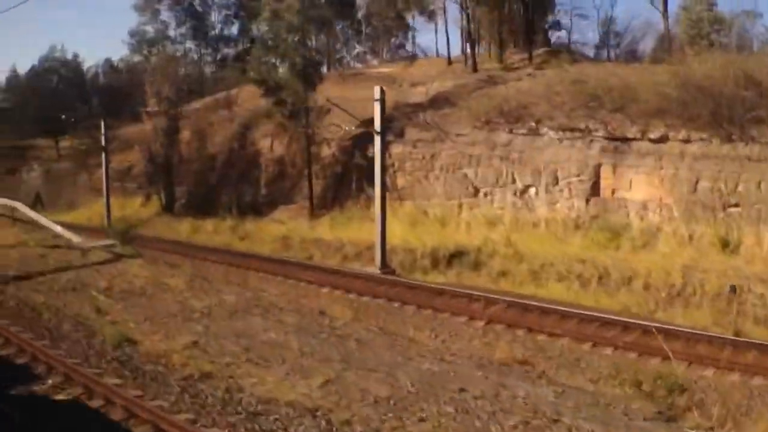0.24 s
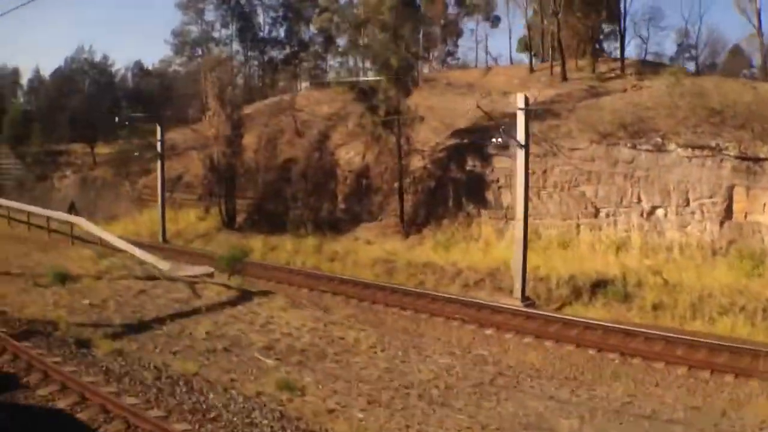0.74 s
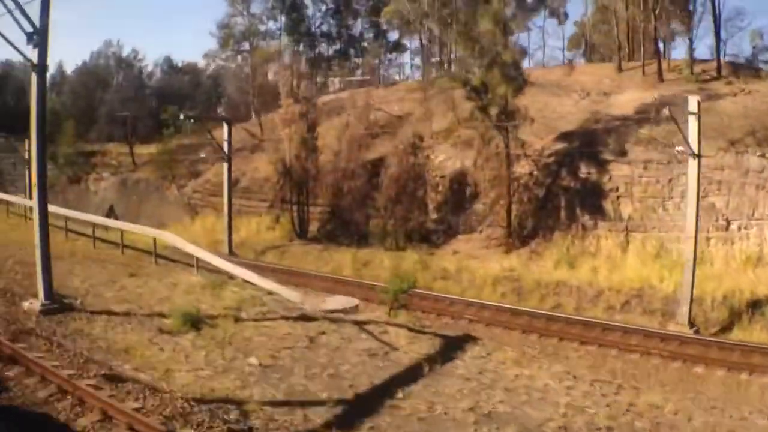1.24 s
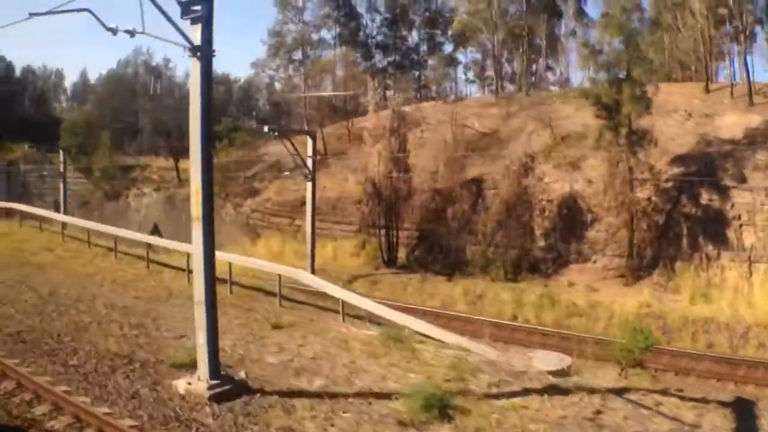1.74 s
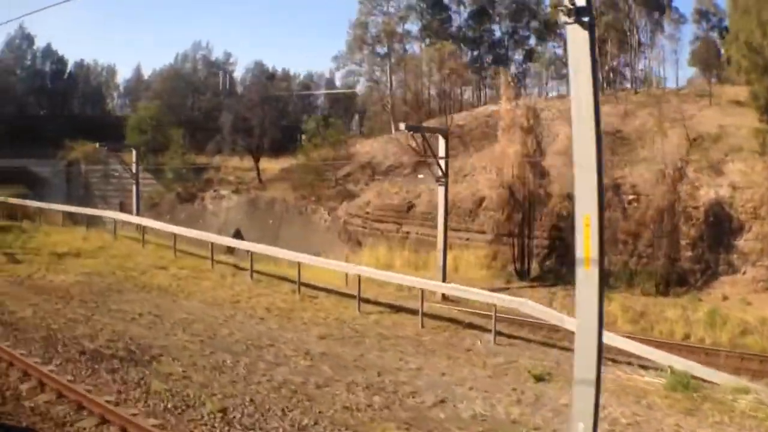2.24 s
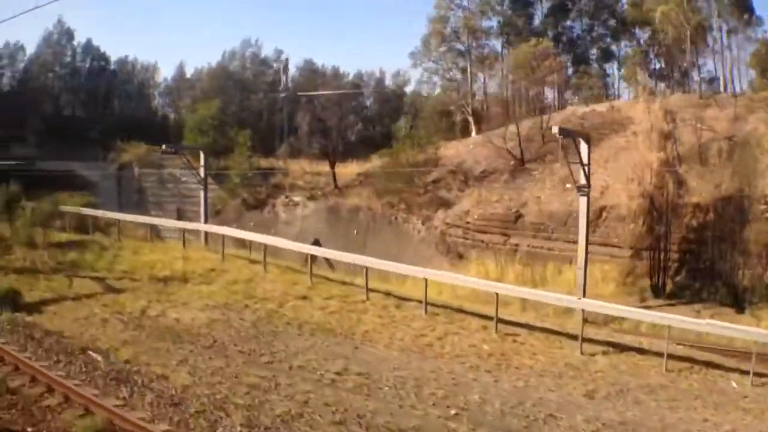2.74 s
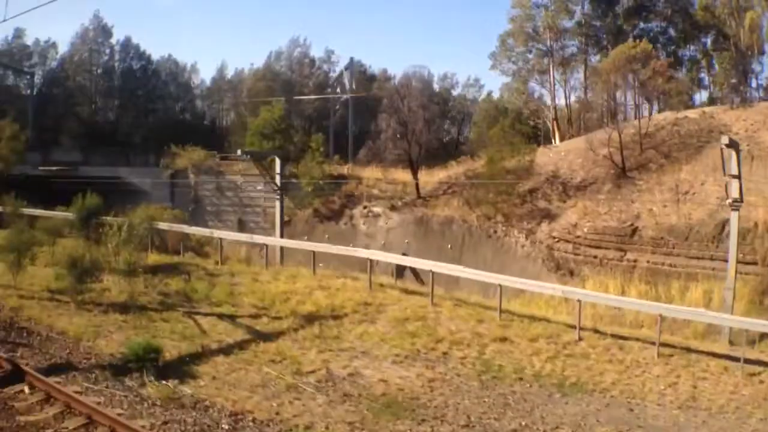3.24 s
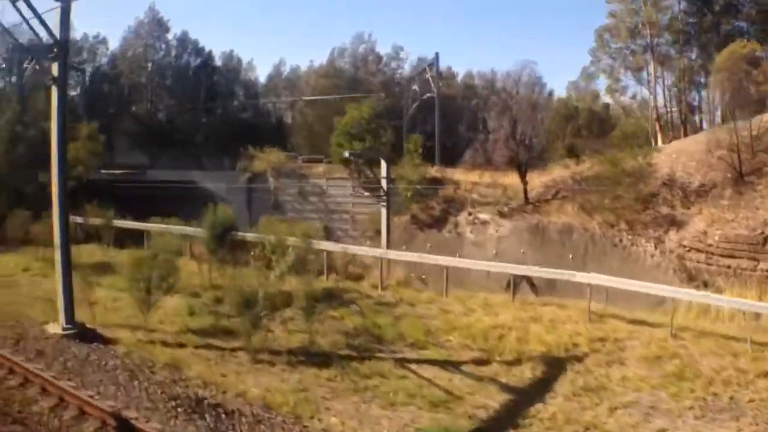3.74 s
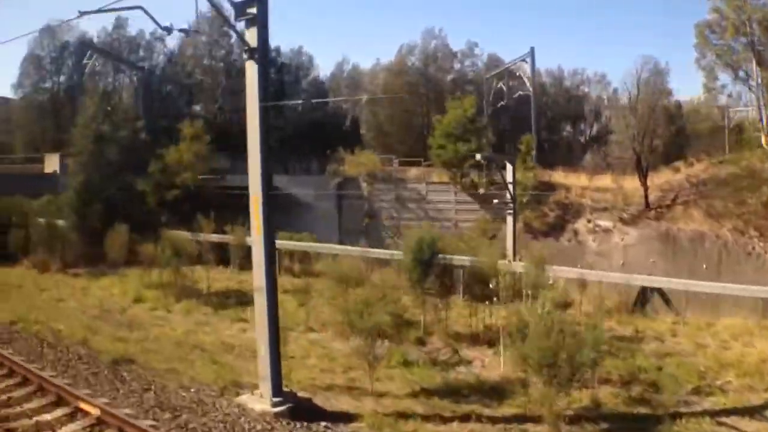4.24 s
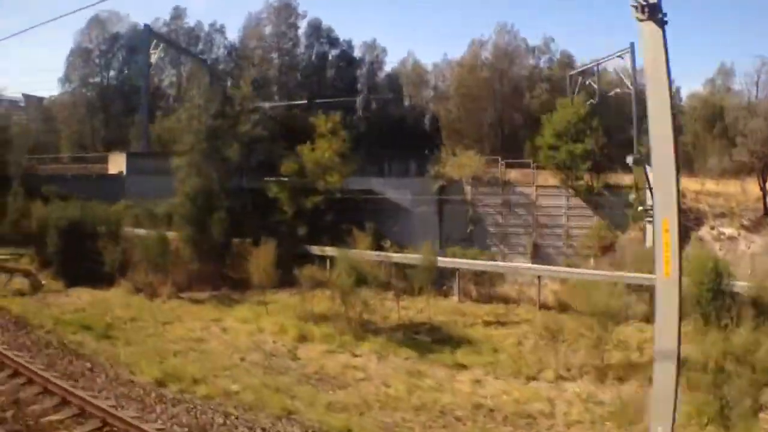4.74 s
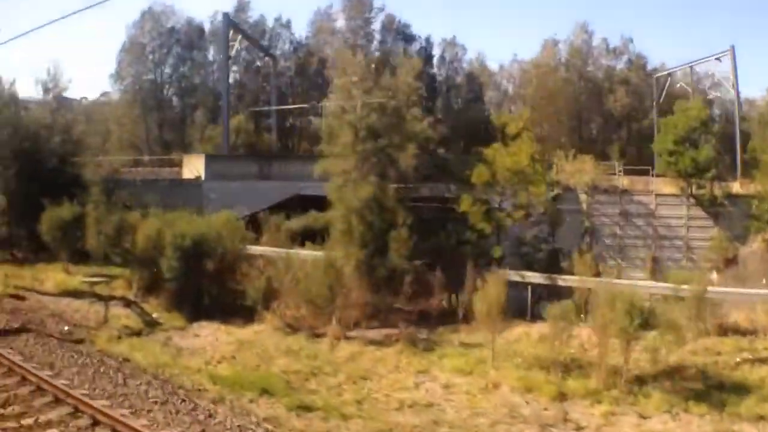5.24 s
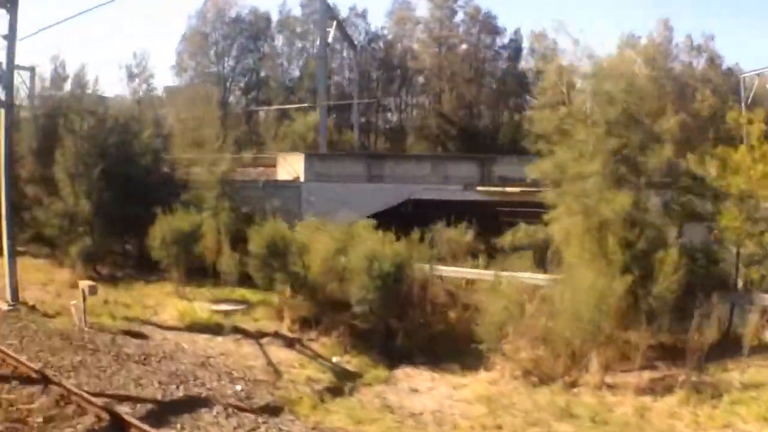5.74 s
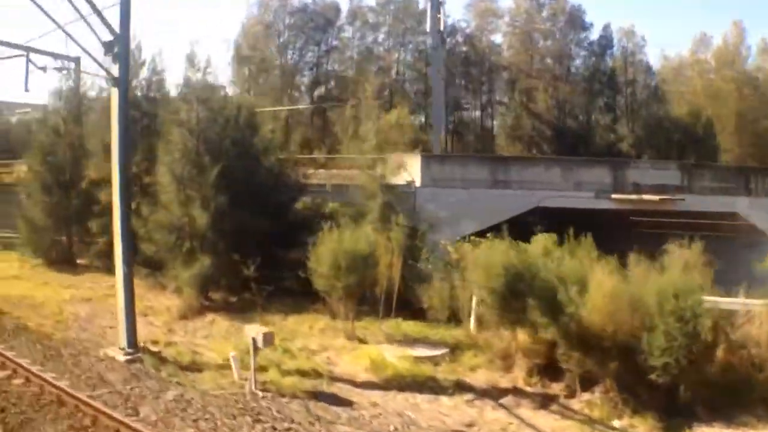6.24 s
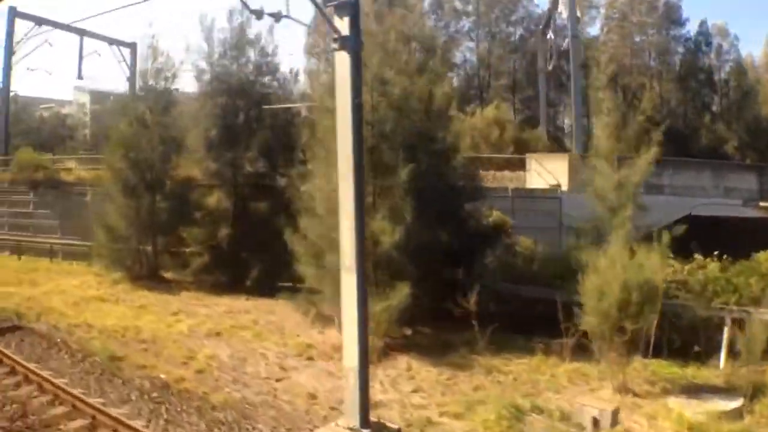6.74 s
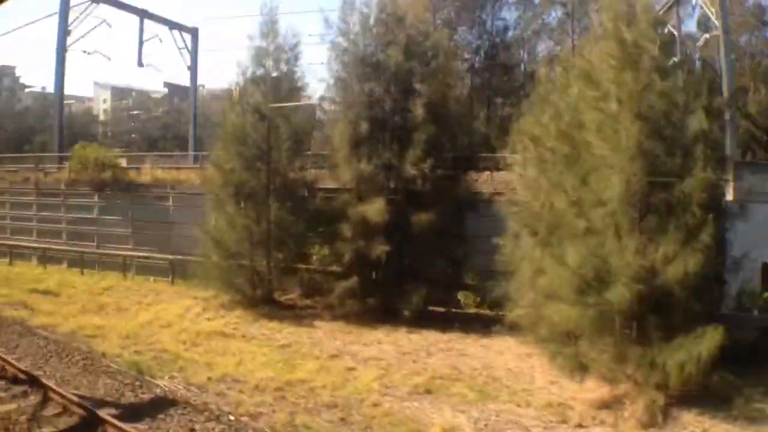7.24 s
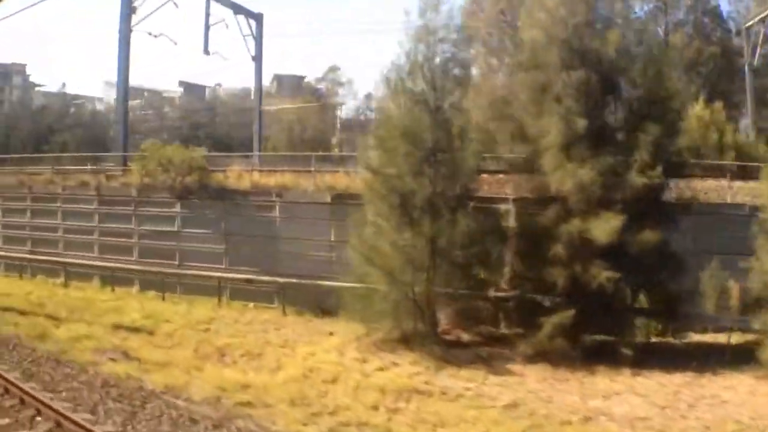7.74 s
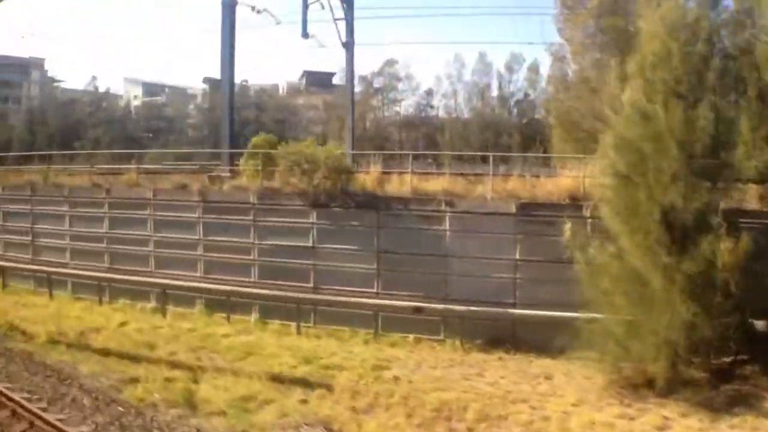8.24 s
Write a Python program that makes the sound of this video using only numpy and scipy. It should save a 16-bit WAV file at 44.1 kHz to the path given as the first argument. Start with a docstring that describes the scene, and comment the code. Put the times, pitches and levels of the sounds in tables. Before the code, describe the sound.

Inside an electric train carriage on a long curve, heard by the window through a small, faintly hissing microphone. Throughout, floor, walls and roof boom and drone at low pitches, restless and uneven, over a wavering underfloor hum. A duller roar of wheels on rail comes through the windows, with slight rattling, ringing panes and a weak airy rush. From 0 to about 2 seconds, flanges hiss and wheel rims sing high and thin, brightest at the very start, fading by 2.5. A small tick falls near 2.6; a soft lighter rub passes around 3. A brief hollow scrape comes at 3.5 to 3.9. Faint singing flickers around 4.4 to 5, with tiny ticks at 5.3 and 5.7. The drone blooms strongest from 5.6 to 6.5, then eases. From about 7.1 to the end at 8.5, a narrow high ring returns over the calmer rumble.

```python
"""A booming, droning floor and high singing wheel rims: inside an electric train on a long curve.
Rough rails shake the wheels; floor, walls and roof ring as resonances driven by noise, with short blooms.
A duller roar, coloured noise with ringing panes, comes through the windows; a wavering sine hums underfloor.
Wheel flanges rub the rail: hiss, and narrow rim modes that sing. One hollow scrape; trim ticks now and then."""
import sys
import numpy as np
from scipy import signal
from scipy.fft import rfft, irfft
from scipy.io import wavfile
from scipy.ndimage import uniform_filter1d

SR = 44100
rng = np.random.default_rng(int(sys.argv[2]) if len(sys.argv) > 2 else 0)


def magnitude_from_level(level_db):
    """Linear magnitude for a level in decibels (20 dB per decade)."""
    exponent = np.asarray(level_db, float) / 20
    return 10 ** exponent


def store_wav(level_fs):
    """Save 16-bit WAV to argv[1]."""
    pcm = np.round(np.clip(np.atleast_2d(level_fs), -1, 1) * 32767)
    wavfile.write(sys.argv[1], SR, pcm.T.astype(np.int16))


N = 373527
TIME = np.arange(N) / SR
HZ = np.arange(N // 2 + 1) * SR / N


def unit(x):
    """Scale to rms 1."""
    return x / np.sqrt(np.mean(x ** 2))


def curves(table):
    """Interpolate the columns of a time table as dB tracks."""
    s, *columns = np.transpose(table)
    return [np.interp(TIME, s, c) for c in columns]


def walk(rate_hz):
    """Random levels held 1 / rate_hz and slewed twice; rms 1."""
    k = int(SR / rate_hz)
    steps = np.repeat(rng.standard_normal(N // k + 1), k)
    slewed = uniform_filter1d(uniform_filter1d(steps, k), k)
    return unit(slewed[:N])


def even(x, hold_s):
    """Divide out swells slower than hold_s; rms 1."""
    k = int(hold_s * SR)
    power = uniform_filter1d(uniform_filter1d(unit(x) ** 2, k), k)
    return unit(x / np.sqrt(power + 0.12))


def ringing(modes, flicker_db, rate_hz):
    """Random shaking through steep resonances, each swelling on its own; rms 1."""
    out = 0
    for hz, width_hz, db in modes:
        shape = 1 / (1 + (2 * (HZ - hz) / width_hz) ** 2)
        ring = unit(irfft(rfft(rng.standard_normal(N)) * shape, N))
        out = out + magnitude_from_level(db + flicker_db * walk(rate_hz)) * ring
    return unit(out)


def gliding(hz, width_hz):
    """Random shaking through one resonance whose centre moves; rms 1."""
    phase = 2 * np.pi * np.cumsum(hz) / SR
    shape = 1 + (2 * HZ / width_hz) ** 2
    a, b = (irfft(rfft(rng.standard_normal(N)) / shape, N) for _ in range(2))
    return unit(a * np.cos(phase) + b * np.sin(phase))


def coloured(points, flicker_db, rate_hz):
    """Noise of a given spectrum in half-octave bands whose levels wander apart; rms 1."""
    hz, db = np.transpose(points)
    octave = np.log2(HZ + 1)
    colour_db = np.interp(octave, np.log2(hz), db, left=-200, right=-200)
    whole = rfft(rng.standard_normal(N)) * magnitude_from_level(colour_db)
    out = 0
    for centre in np.arange(np.log2(hz[0]), np.log2(hz[-1]) + .5, .5):
        band = np.clip(1 - 2 * np.abs(octave - centre), 0, 1)
        out = out + magnitude_from_level(flicker_db * walk(rate_hz)) * irfft(whole * band, N)
    return unit(out)


def swell(s, length_s):
    """A smooth bump of height 1 around s."""
    return np.exp(-(2 * (TIME - s) / length_s) ** 2)


# Slow layer levels. Each row: time in seconds, then walls, drone, roof, roar, rush and air in dB.
LAYER_LEVELS = [(0.0, -31, -33, -38.5, -41, -51.5, -60), (0.5, -30, -30, -34.5, -39.5, -50.5, -61),
                (1.05, -30, -31, -43, -38, -52.5, -62), (1.6, -32.5, -27.5, -35.5, -37.5, -48.5, -60),
                (2.05, -29.5, -29.5, -41, -37.5, -49.5, -61.5), (2.3, -31, -28.5, -43, -41, -54, -64),
                (2.55, -30, -29, -45, -37, -49.5, -61.5), (2.95, -33.5, -31.5, -42, -41.5, -52, -61),
                (3.6, -30, -29.5, -42.5, -38.5, -50, -60), (4.1, -29.5, -30, -34.5, -40, -51.5, -61),
                (4.7, -26, -30.5, -40, -40, -51.5, -62.5), (5.35, -31.5, -26.5, -43, -38.5, -51, -61),
                (5.9, -27, -26.5, -43, -38, -50, -62), (6.5, -31.5, -27, -48.5, -38, -50.5, -61.5),
                (7.0, -32, -25.5, -39, -39.5, -52, -65), (7.5, -31, -31.5, -41, -40.5, -52.5, -64.5),
                (8.05, -32.5, -33.5, -42, -42, -52.5, -63), (8.47, -32.5, -33.5, -47, -39.5, -50.5, -60)]


def layer_db(name):
    """Slow level track of one layer in dB."""
    names = ["walls", "drone", "roof", "roar", "rush", "air"]
    return curves(LAYER_LEVELS)[names.index(name)]


# Rougher stretches of rail. Each row: centre in seconds, rise of the roar in dB, length in seconds.
ROUGH_STRETCHES = [(0.25, 5, 0.2), (0.757, 3.5, 0.26), (1.36, 2, 0.072), (1.487, 2.5, 0.14),
                   (1.97, 2, 0.28), (2.445, 3, 0.086), (2.693, 3.5, 0.15), (3.117, 2.5, 0.3),
                   (4.404, 4, 0.16), (4.647, 3, 0.18), (5.163, 2, 0.18), (5.26, 3, 0.092),
                   (5.37, 1.5, 0.017), (5.481, 4.5, 0.023), (5.644, 4.5, 0.055), (5.753, 4.5, 0.11),
                   (5.898, 2.5, 0.16), (6.34, 0.5, 0.088), (6.45, 3.5, 0.51), (6.943, 3, 0.16),
                   (7.805, -0.5, .12), (8.375, 1.5, .2)]


def rough_rail():
    """Rougher rail shakes harder: rise of the roar in dB."""
    return sum(db * swell(s, length_s) for s, db, length_s in ROUGH_STRETCHES)


# Microphone hiss spectrum. Each row: frequency in Hz, relative density in dB per Hz.
MIC_SPECTRUM = [(2940, -35.5), (5000, -4.5), (6870, -19.5), (8290, -9), (14600, -8.5), (15800, -17.5)]


def microphone_hiss():
    """The small microphone's own smooth noise."""
    level_db = -68
    return magnitude_from_level(level_db) * coloured(MIC_SPECTRUM, .2, 5.)


# Hum level. Each row: time in seconds, rms in dB.
HUM_LEVEL = [(0, -35), (1.5, -38.5), (3, -38), (5.5, -38), (6.1, -40), (7, -39), (8.47, -37)]


def hum():
    """A steady rotating machine gives a sine, wavering slightly in pitch and level."""
    hum_hz = 101.8
    phase = 2 * np.pi * np.cumsum(hum_hz * (1 + .005 * walk(2.5))) / SR
    level_db = curves(HUM_LEVEL)[0] + 1.3 * walk(4.)
    return np.sqrt(2) * magnitude_from_level(level_db) * np.sin(phase)


# Trim ticks. Each row: start in seconds, initial puff level in dB, pitch in Hz, t60 in seconds,
# initial broad crack level in dB.
TRIM_TICKS = [(2.557, -47.5, 5000, .03, -57), (5.315, -66, 11000, .09, -73), (5.333, -66, 10600, .07, -73),
              (5.722, -53, 4600, .035, -59)]


def ticks():
    """Trim ticks: short dying puffs of noise around a pitch, each with a broad thin crack."""
    out = np.zeros(N)
    t = np.arange(SR // 10) / SR
    grits = rng.standard_normal((len(TRIM_TICKS), len(t)))
    broad = signal.butter(2, [2500, 9500], "band", fs=SR, output="sos")
    for (s, db, hz, t60_s, crack_db), grit in zip(TRIM_TICKS, grits):
        k = int(s * SR)
        pitched = signal.butter(2, [0.64 * hz, 1.1 * hz], "band", fs=SR, output="sos")
        puff = magnitude_from_level(db) * unit(signal.sosfilt(pitched, grit))
        crack = magnitude_from_level(crack_db) * unit(signal.sosfilt(broad, grit))
        out[k:k + len(t)] += magnitude_from_level(-60 * t / t60_s) * (puff + crack)
    return out


# Scrape level. Each row: time in seconds, level in dB.
SCRAPE_LEVEL = [(3.4, -80), (3.52, -56), (3.58, -47.5), (3.63, -45), (3.69, -45), (3.74, -51), (3.8, -54),
                (3.95, -66), (4.1, -95)]
# Resonances of the scraped object. Each row: centre in Hz, width in Hz, relative level in dB.
SCRAPE_MODES = [(1160, 250, -3), (1730, 300, -1), (1970, 250, -5), (2370, 110, -2.5), (2300, 500, -3.5),
                (2620, 200, -5), (3120, 600, -10), (3570, 300, -9), (4040, 120, -8), (3950, 500, -7),
                (4600, 600, -13.5)]


def scrape():
    """A brief drag over something hollow excites its resonances."""
    return magnitude_from_level(curves(SCRAPE_LEVEL)[0]) * even(ringing(SCRAPE_MODES, 0.77, 30.), .05)


# Thin lines inside the narrow song. Each row: time in seconds, lower line in dB, upper line in dB.
CORE_LEVELS = [(0, -75, -75), (.8, -70, -76), (1.0, -64, -72), (1.6, -70, -76), (2.3, -87, -88),
               (4.25, -85, -88), (4.45, -70, -75), (4.7, -70, -70), (5.05, -71, -78), (5.3, -84, -85),
               (5.65, -85, -81), (5.85, -77.5, -72.5), (6.15, -71, -73), (6.4, -75, -71), (6.7, -80, -75.5),
               (6.95, -85, -83), (7.15, -70, -70), (7.3, -64, -65), (7.45, -68, -64), (7.65, -60, -70),
               (7.9, -62, -61), (8.1, -63, -65), (8.25, -63, -66), (8.47, -70, -67)]
# Mean pitch of the lower and upper line in Hz.
CORE_HZ = (4376, 4462)


def cores():
    """Two rim modes hold a thin, slightly drifting ring."""
    out = 0
    for db, hz in zip(curves(CORE_LEVELS), CORE_HZ):
        line = even(gliding(hz + 7 * walk(3.), 14.), .08)
        out = out + magnitude_from_level(db + 1.0 * walk(15.)) * line
    return out


# Flange contact. Each row: time in seconds, rubbing hiss in dB, narrow rim song in dB.
FLANGE_LEVELS = [(0.0, -58.5, -59), (0.3, -61, -56), (0.66, -63.5, -61), (0.95, -62.5, -53.5),
                 (1.8, -59.5, -63), (2.35, -62.5, -68), (2.62, -61.5, -72), (2.74, -67, -73),
                 (2.84, -64.5, -71), (2.98, -59, -73), (3.15, -58, -76), (3.45, -61, -76),
                 (3.66, -57.5, -65), (3.95, -61, -77), (4.2, -66, -73), (4.38, -61.5, -67),
                 (4.72, -62.5, -62.5), (5.03, -63, -69), (5.15, -67.5, -72), (5.55, -68, -79),
                 (5.8, -68, -69.5), (6.4, -66.5, -67.5), (6.65, -67.5, -73), (6.95, -69.5, -75),
                 (7.1, -70, -63), (7.2, -70, -60), (7.28, -71, -55), (7.52, -70, -57.5), (7.76, -70, -58),
                 (7.88, -70.5, -58), (7.93, -69, -57.5), (8.2, -66, -61), (8.47, -69, -64)]
# Rubbing hiss spectrum. Each row: frequency in Hz, relative density in dB per Hz.
RUB_SPECTRUM = [(3300, -38.5), (4100, -10), (4800, -2.5), (5950, -3), (7600, -6), (8900, -13.5),
                (10600, -16.5), (12400, -22), (15000, -25.5)]
# Other rim songs and a brief lighter contact. Each row: time in seconds, level in dB.
WIDE_SONG = [(0, -50.5), (.2, -51), (.5, -51.5), (.8, -52.5), (1.1, -55.5), (1.5, -53), (1.8, -55.5),
             (2.05, -60), (2.25, -63.5), (2.45, -69), (2.7, -80), (2.9, -97)]
HIGH_SONG = [(0, -47), (.18, -51.5), (.36, -63), (.75, -69), (1.0, -87), (1.5, -85), (1.7, -70),
             (2.05, -72), (2.3, -90), (4.3, -91), (4.45, -66), (4.8, -71), (5.1, -91)]
THIN_SONG = [(6.2, -88.5), (6.6, -74), (7.0, -76), (7.3, -75), (7.8, -72), (8.2, -78), (8.47, -83)]
LIGHT_CONTACT = [(2.8, -97), (2.9, -71), (3.0, -63), (3.12, -61), (3.22, -66), (3.28, -75), (3.4, -93.5)]
# Rim modes, a group each for narrow, wide, high, thin and light contact.
# Each row: centre in Hz, width in Hz, relative level in dB.
RIM_MODES = [
    [(4420, 90, -3.5), (4200, 60, -12), (4300, 100, -7.5), (4544, 110, -9)],
    [(4660, 40, -8.5), (4851, 35, -12.5), (4770, 40, -10), (4697, 120, -2.5), (4820, 100, -5.5),
     (4650, 50, -7.5), (4540, 130, -4), (4100, 130, -17)],
    [(6620, 50, -6), (6830, 290, -1.5), (6540, 260, -5)],
    [(8150, 200, 3.5), (8500, 260, 2)],
    [(3750, 200, -2), (8800, 800, -12), (10500, 1000, -14.5)],
]


def flanges():
    """Flanges rub the rail: hiss, and rim modes kept going by unsteady slipping."""
    rub_db, narrow_db = curves(FLANGE_LEVELS)
    others = (WIDE_SONG, HIGH_SONG, THIN_SONG, LIGHT_CONTACT)
    songs_db = [narrow_db] + [curves(song)[0] for song in others]
    songs = 0
    for db, modes in zip(songs_db, RIM_MODES):
        song = even(ringing(modes, 1.4, 12.0), 0.057)
        songs = songs + magnitude_from_level(db + .9 * walk(30.)) * song
    rub = magnitude_from_level(rub_db + 0.61 * walk(12.)) * coloured(RUB_SPECTRUM, 0.75, 12.)
    return rub + songs + cores()


# Leaking air spectrum. Each row: frequency in Hz, relative density in dB per Hz.
SEAL_SPECTRUM = [(2200, -32), (2650, -3), (3100, -1), (3750, -1), (4100, -4), (5000, -16.5), (6500, -37)]


def air(flicker):
    """Air noise leaking through the seals."""
    rise_share = 0.42  # of the roar's rise
    level_db = layer_db("air") + rise_share * rough_rail() + 1.0 * flicker
    return magnitude_from_level(level_db) * even(coloured(SEAL_SPECTRUM, 1.0, 13.0), 0.12)


# Rush spectrum. Each row: frequency in Hz, relative density in dB per Hz.
RUSH_SPECTRUM = [(700, -47.5), (950, -3.5), (1120, -10), (1210, 3), (1300, -5), (1450, -2), (2150, -3),
                 (2480, -7.5), (2640, -11.5), (3100, -35.5), (3600, -56)]
# Window frames, then loose fittings. Each row: centre in Hz, width in Hz, relative level in dB.
FRAME_MODES = [(1196, 28, -2.5), (1344, 40, -4), (1485, 37, 0), (1625, 43, -6), (1765, 56, 2),
               (1937, 60, 1), (2140, 28, -2.5), (2293, 45, -7), (2435, 52, -4.5)]
FITTING_MODES = [(1105, 140, -1.5), (1330, 130, -0.5), (1547, 160, 1), (1794, 150, 0), (2067, 150, 0),
                 (2305, 160, -2.5), (2530, 190, -8.5)]


def rush():
    """A rush brighter than the roar, with ringing frames and loose fittings."""
    rise_share = 0.92  # of the roar's rise
    frames = magnitude_from_level(-7.5) * ringing(FRAME_MODES, 3.6, 12.0)
    fittings = magnitude_from_level(-6) * ringing(FITTING_MODES, 4.5, 22.)
    level_db = layer_db("rush") + rise_share * rough_rail() + 0.9 * walk(14.)
    return magnitude_from_level(level_db) * even(coloured(RUSH_SPECTRUM, 1.7, 18.0) + frames + fittings, 0.2)


# Roar spectrum. Each row: frequency in Hz, relative density in dB per Hz.
ROAR_SPECTRUM = [(180, -26), (300, -1.5), (317, -3), (453, -4), (682, -7), (768, -6.5), (1100, -18.5),
                 (1430, -33), (2420, -120)]
# Window panes. Each row: centre in Hz, width in Hz, relative level in dB.
PANE_MODES = [(358, 32, 0.5), (420, 48, 0.5), (491, 18, -0.5), (573, 26, 1), (629, 25, -2.5),
              (784.5, 38, -2), (883, 43, -6)]


def roar(flicker):
    """The dull roar of steel on steel, with panes that ring up and down independently."""
    panes = magnitude_from_level(-5.0) * ringing(PANE_MODES, 3.1, 10.)
    level_db = layer_db("roar") + rough_rail() + 0.84 * flicker
    return magnitude_from_level(level_db) * even(coloured(ROAR_SPECTRUM, 1.4, 12.) + panes, 0.17)


def rolling():
    """Wheels on rail, heard as roar, rush and air; roar and air flicker together."""
    flicker = walk(16.)
    return roar(flicker) + rush() + air(flicker)


# Low shaking resonances. Each row: centre in Hz, width in Hz, relative level in dB.
SHAKE_MODES = [(33, 20, -19), (52, 24, -2), (83.6, 14, 2)]
# Slow offset of the shaking. Each row: time in seconds, offset in dB.
SHAKE_RISE = [(0, 3), (2, 1.5), (5, -1.5), (6.3, 3.5), (7.6, 3), (8.47, 1)]


def shaking():
    """Low resonances under continuous random shaking."""
    base_db = -40.5
    return magnitude_from_level(base_db + curves(SHAKE_RISE)[0]) * ringing(SHAKE_MODES, 0.99, 1.7)


# Roof resonance. Each row: centre in Hz, width in Hz, relative level in dB.
ROOF_MODES = [(271.2, 24, 0)]


def roof():
    """The roof rings at one resonance."""
    return magnitude_from_level(layer_db("roof")) * even(ringing(ROOF_MODES, .6, 1.7), 0.18)


# Floor resonance. Each row: centre in Hz, width in Hz, relative level in dB.
BOOM_MODES = [(63.8, 10, 0)]


def boom():
    """The floor booms at one low resonance."""
    level_db = -40.5
    return magnitude_from_level(level_db) * even(ringing(BOOM_MODES, .6, 12.0), 0.26)


# Wall resonances. Each row: centre in Hz, width in Hz, relative level in dB.
WALL_MODES = [(114, 40, -2.5), (140, 34, 0), (162.5, 27, -3.5), (180, 26, -2.5)]


def walls():
    """Fixed wall resonances plus one whose favoured pitch wanders."""
    wander_hz = 150.5 + 18 * walk(7.)
    ring = ringing(WALL_MODES, 1.0, 4.4) + 0.58 * gliding(wander_hz, 10.7)
    return magnitude_from_level(layer_db("walls")) * even(ring, 0.15)


# Drone resonances. Each row: centre in Hz, width in Hz, relative level in dB.
DRONE_MODES = [(202.8, 23.6, -1), (232, 29.7, -1), (246.7, 14.7, -5)]


def drone():
    """Fixed resonances plus a wandering one, swelling over rough rail."""
    rise_share = 0.86  # of the roar's rise
    wander_hz = 224.2 + 11 * walk(5.)
    ring = ringing(DRONE_MODES, 1.1, 3.3) + 0.9 * gliding(wander_hz, 12.)
    return magnitude_from_level(layer_db("drone") + rise_share * rough_rail()) * even(ring, 0.097)


# Rumble blooms. Each row: centre in seconds, pitch in Hz, peak rms level in dB, length in seconds.
RUMBLE_BLOOMS = [(0.053, 63.8, -30.5, 0.25), (0.377, 64.5, -31, 0.16), (0.724, 64, -29, 0.13),
                 (0.707, 236, -25, 0.084), (0.975, 129.7, -25.5, 0.11), (1.295, 64, -32, .14),
                 (1.404, 162.3, -22.5, 0.043), (1.46, 267.7, -28.5, 0.1), (1.725, 269.7, -28, 0.1),
                 (1.86, 64.7, -28.5, 0.39), (2.192, 134, -27, 0.17), (2.526, 232, -22.5, 0.054),
                 (2.667, 232, -25, 0.15), (3.024, 235.2, -22.5, 0.077), (3.14, 63, -32.5, 0.49),
                 (3.52, 132, -27, 0.11), (3.99, 206, -28.5, 0.18), (4.097, 125, -27.5, 0.1),
                 (4.18, 65.5, -33, 0.25), (4.297, 202, -28.5, 0.27), (4.43, 228, -26, 0.11),
                 (4.55, 63.7, -35, 0.16), (4.625, 234, -23, 0.055), (4.705, 141.2, -23, 0.098),
                 (5.06, 62, -34.5, 0.11), (5.214, 232, -26, 0.29), (5.52, 66.5, -30.5, .26),
                 (5.66, 229.1, -20.5, 0.15), (5.71, 140, -28.5, 0.19), (5.883, 61.6, -29.5, 0.096),
                 (5.89, 215, -24.5, 0.062), (6.052, 225, -24.5, 0.055), (6.128, 220, -23, 0.044),
                 (6.286, 180, -25, 0.14), (6.297, 228, -18, 0.04), (6.36, 225, -20, 0.04),
                 (6.406, 246, -22.5, 0.11), (6.441, 212.4, -21.5, 0.13), (6.492, 166, -24.5, 0.12),
                 (6.896, 232, -23.5, 0.15), (6.97, 213, -24, 0.074), (7.447, 232, -30, 0.11),
                 (7.603, 64, -36, 0.23), (7.56, 140, -32.5, 0.12), (7.814, 345, -40.5, 0.18),
                 (0.216, 770, -42, .08), (.25, 500, -44, .1), (0.803, 484.5, -42, .12),
                 (1.315, 464, -40, .08), (1.36, 350, -42, 0.049), (1.92, 490, -40.5, 0.17),
                 (1.998, 750, -43, .1), (2.09, 520, -41, .1), (2.436, 452, -40, 0.073),
                 (2.708, 669, -42, .07), (2.7, 400, -41.5, .09), (4.617, 450, -38.5, 0.063),
                 (5.25, 452, -36.5, .07), (5.72, 445, -38.5, 0.19), (6.11, 570, -45.5, 0.075),
                 (6.402, 425, -40.5, .16), (6.88, 420, -42.5, .06), (7.07, 629, -44, .06),
                 (8.424, 351, -39, 0.054), (8.42, 980, -48, .06)]


def blooms():
    """The rumble blooms briefly at single pitches: swelling sines that waver together."""
    waver_s = np.cumsum(1 + 0.01201 * walk(12.)) / SR
    starts = rng.random(len(RUMBLE_BLOOMS))
    out = 0
    for (s, hz, db, length_s), start in zip(RUMBLE_BLOOMS, starts):
        tone = np.sqrt(2) * np.sin(2 * np.pi * (hz * waver_s + start))
        out = out + magnitude_from_level(db) * swell(s, length_s) * tone
    return out


def body():
    """Floor, walls and roof ring as the track shakes them; a loose panel slaps twice per drone cycle."""
    low = boom() + walls() + drone() + roof() + blooms()
    panel = 1 / (1 + (2 * (HZ - 455) / 60) ** 2)
    slap = irfft(rfft(low ** 2) * panel, N)  # squaring doubles the frequency
    return low + magnitude_from_level(-4.5) * slap + shaking()


def scene():
    """Everything heard at one seat by the window."""
    return (hum() + ticks() + scrape() + flanges() + rolling() + body())[None]


def top_cut(x):
    """Nothing passes above the cut-off."""
    return signal.sosfilt(signal.butter(12, 15970, fs=SR, output="sos"), x)


def record(dry):
    """The small microphone adds its hiss to the scene."""
    mix = dry + microphone_hiss()
    return top_cut(mix)


dry = scene()
out = record(dry)
store_wav(out)
```